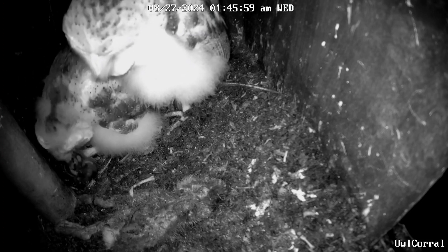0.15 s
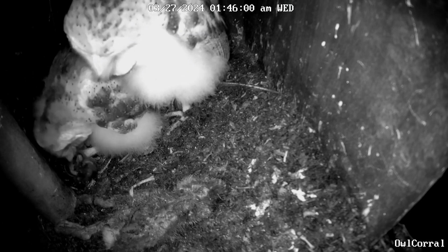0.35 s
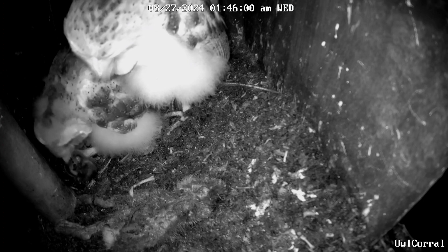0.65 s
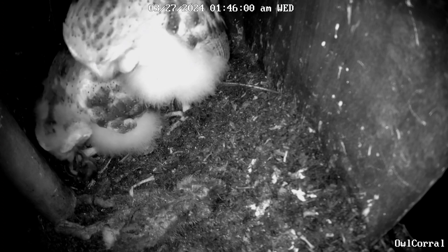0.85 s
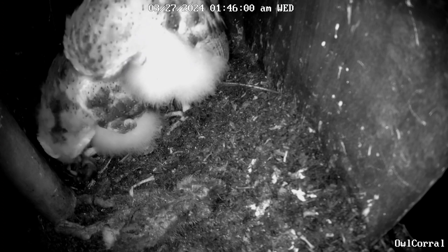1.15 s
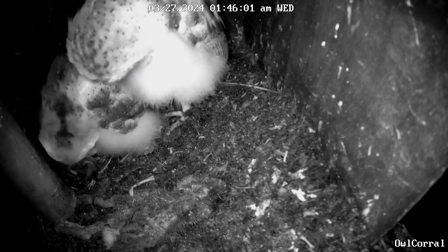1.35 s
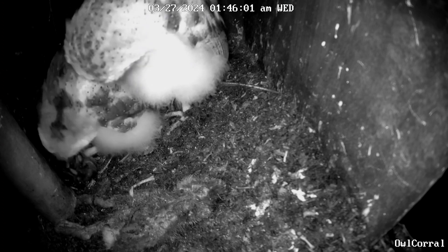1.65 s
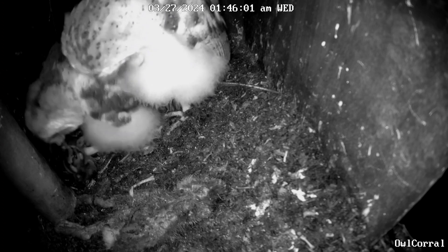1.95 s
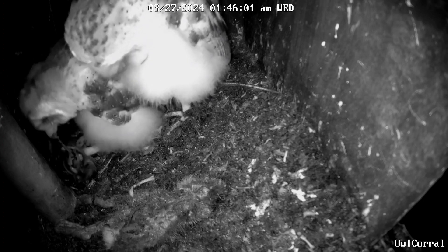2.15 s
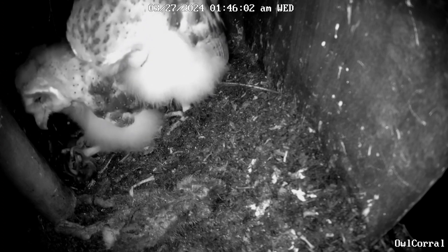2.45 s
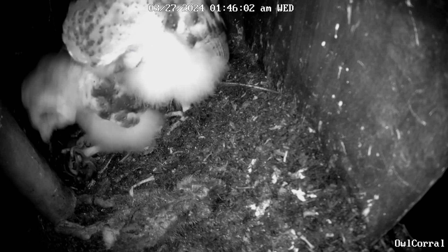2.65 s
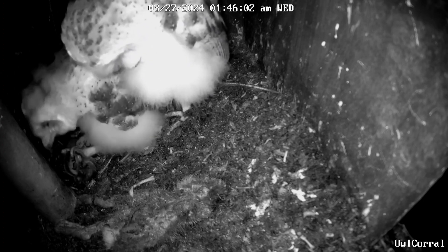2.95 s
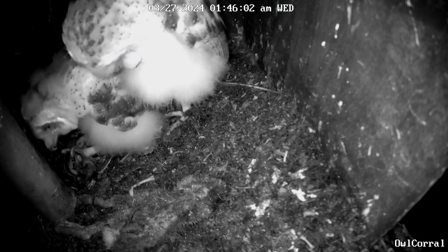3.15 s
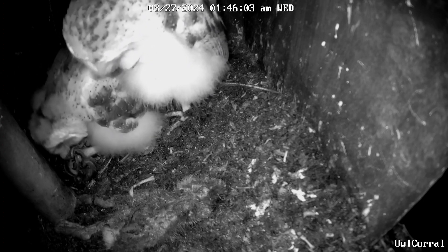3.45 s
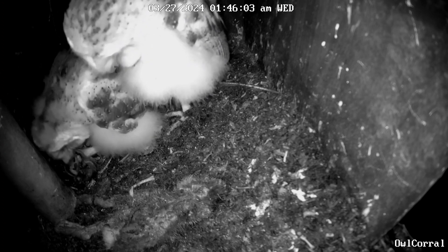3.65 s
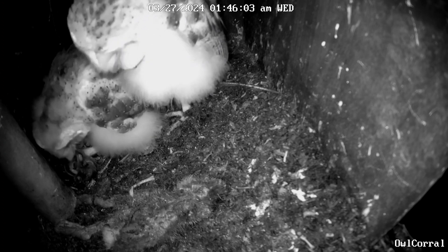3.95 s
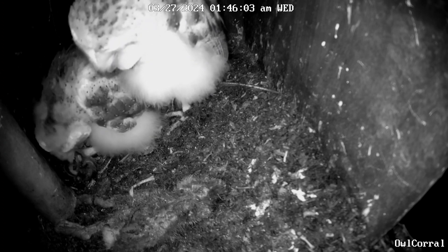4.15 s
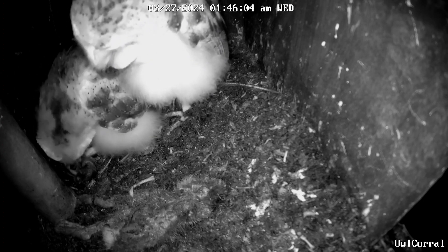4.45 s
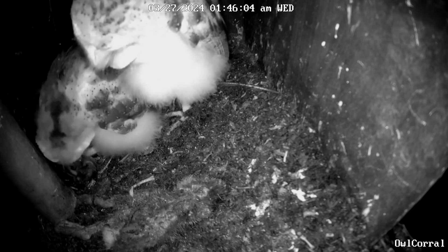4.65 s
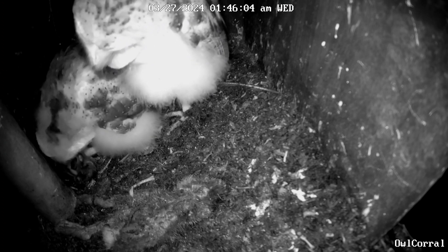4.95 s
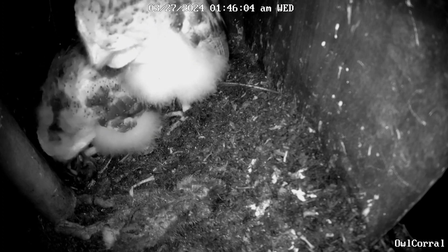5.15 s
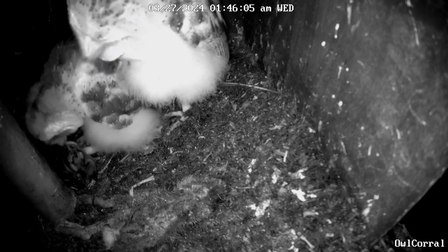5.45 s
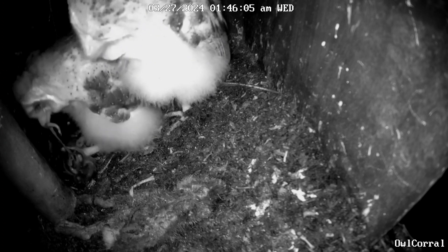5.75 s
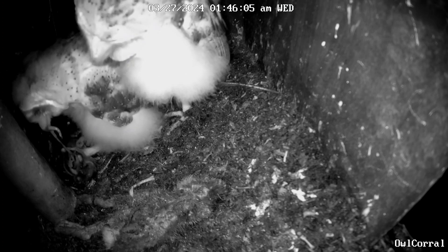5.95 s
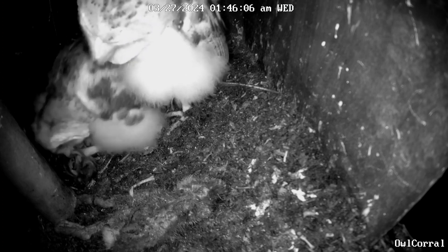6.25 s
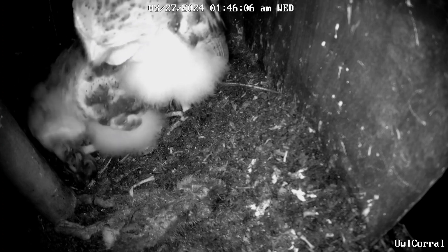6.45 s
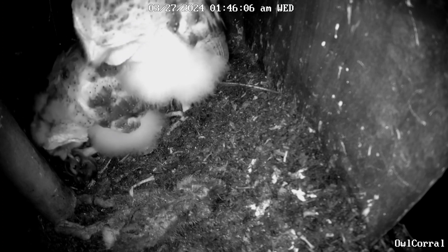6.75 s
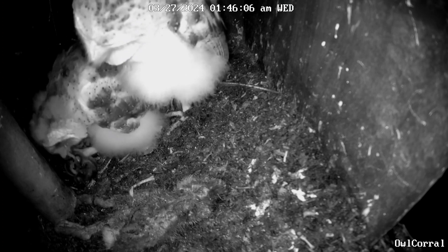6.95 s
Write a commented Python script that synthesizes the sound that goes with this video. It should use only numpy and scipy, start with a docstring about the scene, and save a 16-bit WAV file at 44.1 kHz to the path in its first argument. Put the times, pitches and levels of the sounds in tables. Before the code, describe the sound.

A young owl begs with three harsh, swelling hisses over faint trilling chitters inside a wooden nest box, ending with low thumps on the boards.

```python
"""Owlets in a wooden nest box at night, heard through a camera's small mono microphone.
A low hum, rumble and even ticking (shaped noise) run throughout, with chitter trills of tiny gliding pips.
Dull scuffs of noise come at 1.1, 3.0, 4.8 and 6.6 s, and one faint low peep, a gliding sine, at 2 s.
From 2.3, 3.9 and 6.1 s an owlet begs with a harsh swelling hiss: noise through throat and beak resonances.
Just before the third hiss, and more after it, an owl bumps the boards, whose decaying modes boom."""
import sys
import numpy as np
from scipy import signal
from scipy.fft import rfft, irfft
from scipy.io import wavfile

SR = 44100
rng = np.random.default_rng(int(sys.argv[2]) if len(sys.argv) > 2 else 0)


def file_out(sig):
    """Save sig as 16-bit WAV at sys.argv[1]."""
    # one column per channel
    cols = np.atleast_2d(sig).T
    # limit, then scale
    lim = np.clip(cols, -1, 1)
    pcm = np.round(lim * 32767).astype(np.int16)
    wavfile.write(sys.argv[1], SR, pcm)


N = 312669
TIME = np.arange(N) / SR  # s
FREQ = np.arange(N // 2 + 1) * SR / N  # Hz


def undb(db):
    """Decibels to gain."""
    return 10 ** (np.asarray(db) / 20)


def add(track, start_s, sound):
    """Mix a sound into the track; one due before the track begins starts with it."""
    i = max(int(start_s * SR), 0)
    track[i:i + len(sound)] += sound[:max(N - i, 0)]


def colour(x, gain):
    """Filter by a gain per frequency; the result has rms 1."""
    y = irfft(rfft(x) * gain, N)
    return y / y.std()


def noise(gain):
    """Coloured noise of rms 1."""
    return colour(rng.standard_normal(N), gain)


def wander(rate_hz):
    """Smooth random motion of spread 1, mostly slower than the given rate."""
    return noise(1 / (1 + (FREQ / rate_hz) ** 4))


def resonances(modes):
    """Gain of steep-sided resonances (centre_hz, nominal width_hz, level_db), summed in power."""
    power = 0
    for centre_hz, width_hz, level_db in modes:
        offset = (FREQ - centre_hz) / (0.68 * width_hz)
        power = power + undb(2 * level_db) / (1 + offset ** 2) ** 2
    return np.sqrt(power)


def contour(points):
    """Gain of a spectrum drawn through points (freq_hz, level_db) on a log frequency axis."""
    hz, db = np.transpose(points)
    return undb(np.interp(np.log(FREQ + 1), np.log(hz), db))


def note(length_s, from_hz, to_hz):
    """A short gliding sine that swells and fades."""
    u = np.linspace(0, 1, int(length_s * SR))
    phase = 2 * np.pi * np.cumsum(from_hz + (to_hz - from_hz) * u) / SR
    return np.sin(np.pi * u) ** 2 * np.sin(phase)


def squeaks(table, rough_db, rough_hz):
    """Single gliding notes, made hoarse by a fast random flutter of level."""
    out = np.zeros(N)
    for start_s, length_s, from_hz, to_hz, peak_db in table:
        add(out, start_s, undb(peak_db) * note(length_s, from_hz, to_hz))
    return out * undb(rough_db * wander(rough_hz))


# spectrum of night rumble and microphone hiss, relative:
# freq_hz [Hz], level_db [dB per Hz]
NIGHT_SPECTRUM = [(20, -0.5), (45, -7), (120, -5), (150, -18.5), (230, -26), (400, -29), (700, -31.5),
                  (1100, -30.5), (1800, -34.5), (3200, -35.5), (4500, -39), (8000, -41.5)]


def night(level_db=-63):
    """Noise of rumble and microphone hiss, whose level wavers slowly."""
    return noise(contour(NIGHT_SPECTRUM) * (FREQ > 12)) * undb(level_db + 0.5 * wander(3))


def hum(centre_hz=121.8, width_hz=12, level_db=-65):
    """A narrow band of noise, heard as a wavering low hum."""
    return undb(level_db) * noise(resonances([(centre_hz, width_hz, 0)]))


def ticking(first_s=0.258, every_s=2 / 15, length_s=0.01, level_db=-71):
    """The camera's faint ticks: puffs of high noise, evenly spaced in a pattern that restarts every second."""
    times = (first_s + np.arange(0, 1, every_s)) % 1
    ticks = sum(np.exp(-(2 * (TIME % 1 - s) / length_s) ** 2) for s in times)
    return undb(level_db) * ticks * noise(resonances([(6150, 2600, 0)]))


# feet shuffling in the litter:
# middle_s [s], length_s [s], centre_hz [Hz], level_db [dB]
SCUFFS = [(1.107, 0.0094, 710, -71), (3.026, 0.025, 307, -61.5), (4.789, 0.018, 820, -64),
          (6.582, 0.01, 400, -55)]


def shuffles():
    """Brief dull scuffs in the litter, each a puff of band noise."""
    out = np.zeros(N)
    for middle_s, length_s, centre_hz, level_db in SCUFFS:
        puff = np.exp(-(2 * (TIME - middle_s) / length_s) ** 2)
        out += undb(level_db) * puff * noise(resonances([(centre_hz, 0.45 * centre_hz, 0)]))
    return out


# feet and body against the boards:
# start_s [s], push_db [dB], contact_s [s]
BOARD_BUMPS = [(5.913, -45, 0.0042), (5.922, -36, 0.0078), (6.554, -42, 0.004), (6.627, -28, 0.0031),
               (6.648, -43.5, 0.0034), (6.82, -46, 0.004), (6.882, -34, 0.003), (6.903, -29, 0.003),
               (6.917, -18.5, 0.011)]
# ringing modes of the box:
# mode_hz [Hz], t60_s [s], level_db [dB, relative]
BOARD_MODES = [(76.7, 0.15, 2), (98, 0.29, -4.5), (131.4, 0.25, 5), (170, 0.29, -22), (218, 0.25, -8.5),
               (266, 0.083, -15), (295, 0.11, -13.5), (390, 0.12, -16.5), (466, 0.076, -13.5)]


def bumps():
    """Soft pushes ring the boards; a longer contact gives a duller boom."""
    pushes, t = np.zeros(N), TIME[:SR // 2]
    for start_s, push_db, contact_s in BOARD_BUMPS:
        push = np.hanning(int(contact_s * SR))
        add(pushes, start_s, undb(push_db) * push / push.sum())
    ring = np.zeros(len(t))
    for mode_hz, t60_s, level_db in BOARD_MODES:
        ring += undb(level_db - 60 * t / t60_s) * np.sin(2 * np.pi * mode_hz * t)
    boom = signal.fftconvolve(pushes, ring)[:N]
    # slow pressure leaks out through the entrance hole
    leak = signal.butter(6, 68, "high", fs=SR, output="sos")
    return signal.sosfilt(leak, boom)


PIPS_PER_S = 55  # pace of all trilling


def throb(depth_db):
    """Gain that pulses at the slightly uneven pace of a trill."""
    phase = 2 * np.pi * np.cumsum(PIPS_PER_S * (1 + 0.025 * wander(6))) / SR
    return undb(depth_db * np.sin(phase))


def twitter(centre_hz=2500, width_hz=340, level_db=-79, swell_db=4):
    """The faintest trilling: pulsing band noise that goes on throughout, swelling and sinking."""
    band = noise(resonances([(centre_hz, width_hz, 0)]))
    return band * throb(depth_db=2.5) * undb(level_db + swell_db * wander(4))


UNDER_FOLLOWS = 0.41  # the low tone fades this many dB per dB of the pip


def trill(crest_s, pitch_hz, level_db, under_db, under_share=0.42):
    """Pips (middle_s, pitch_hz, level_db, under_hz, under_db) that climb, swell slowly and fade faster."""
    k = np.arange(-7, 4)  # pips counted from the loudest
    drop = np.where(k < 0, 1.7, 4.2) * abs(k) ** 1.4  # dB below the loudest
    pitch = pitch_hz * (1 + 0.014 * k)
    return zip(crest_s + k / PIPS_PER_S, pitch, level_db - drop,
               under_share * pitch, under_db - UNDER_FOLLOWS * drop)


def chip(first_s, pitch_hz, level_db, under_db, under_share=0.483):
    """Three pips, listed as for a trill, that start at full strength, climb and die fast."""
    k = np.arange(3)
    drop = 2.4 * k ** 2  # dB below the first
    pitch = pitch_hz * (1 + 0.0091 * k)
    return zip(first_s + k / PIPS_PER_S, pitch, level_db - drop,
               under_share * pitch, under_db - UNDER_FOLLOWS * drop)


# echoes of a pip off the box walls:
# delay_s [s], level_db [dB re direct sound]
WALL_ECHOES = [(.0034, -18.5), (.0066, -11.5), (0.0124, -12.5), (0.017, -11)]


def box_response(ring_db=-13, ring_t60_s=0.12):
    """Impulse response of the box: direct sound, wall echoes and a decaying noise tail."""
    t = TIME[:SR // 8]
    box = rng.standard_normal(len(t)) * undb(-60 * t / ring_t60_s)
    box *= undb(ring_db) / np.linalg.norm(box)
    box[0] = 1
    for delay_s, level_db in WALL_ECHOES:
        box[int(delay_s * SR)] += undb(level_db)
    return box


# swelling trills of the chicks, describing the loudest pip:
# crest_s [s], pitch_hz [Hz], level_db [dB before trim], under_db [dB of its low tone before trim]
CHICK_TRILLS = [(0.02, 2640, -62, -76), (0.103, 2570, -59.5, -76), (0.362, 2560, -56.5, -77),
                (0.6, 3010, -66, -74), (0.826, 2445, -42.5, -65), (0.902, 2490, -51, -66.5),
                (1.619, 2430, -52, -77), (1.649, 3100, -59.5, -79), (2.105, 2520, -65, -79),
                (2.25, 3050, -64, -69), (2.302, 2384, -46.5, -65), (2.846, 2476, -42.5, -54.5),
                (3.151, 3140, -58.5, -77), (3.203, 2410, -50.5, -70), (3.599, 2416, -42, -65.5),
                (3.657, 2570, -61, -68), (4.31, 2610, -41, -56), (4.361, 3000, -54, -69),
                (4.487, 2610, -51.5, -74), (4.576, 3050, -57.5, -80), (4.885, 2434, -44.5, -62),
                (5.196, 2424, -45, -74), (5.578, 2405, -46, -60), (6.031, 2355, -60.5, -66.5),
                (6.108, 2360, -47, -65), (6.766, 2426, -39, -58), (6.85, 2433, -39.5, -52.5)]
# short chips, following most trills by about 0.12 s and describing the first pip:
# first_s [s], pitch_hz [Hz], level_db [dB before trim], under_db [dB of its low tone before trim]
CHICK_CHIPS = [(0.165, 2710, -55.5, -79), (0.477, 2620, -57.5, -72), (0.963, 2470, -40, -64),
               (1.726, 2520, -44.5, -65), (1.782, 3280, -51, -76), (2.974, 2690, -56.5, -66),
               (3.284, 3280, -57, -77), (3.326, 2460, -46, -64), (3.717, 2480, -36, -53.5),
               (3.783, 2660, -47.5, -66), (4.606, 2770, -57, -71), (4.71, 3240, -59.5, -76),
               (5.023, 2530, -40, -63), (5.302, 2460, -41, -65), (5.69, 2444, -43, -49.5),
               (5.74, 2770, -61, -74), (6.963, 2524, -37.5, -48.5)]


def chitter(pip_s=0.009, glide=0.048, pip_trim_db=0.5, under_trim_db=-2, scatter_db=0.88, hoarse_db=1.5):
    """Tiny rising pips, each over a weak tone at under half its pitch, bounce around the box."""
    out = np.zeros(N)
    calls = [trill(*row) for row in CHICK_TRILLS] + [chip(*row) for row in CHICK_CHIPS]
    for pips in calls:
        for middle_s, pitch_hz, level_db, under_hz, under_db in pips:
            late, sharp, loud = rng.standard_normal(3)  # no two pips are quite alike
            # sweep upward through the pitch, by a share of it to either side
            sweep = (1 + 0.0092 * sharp) * np.array([1 - glide, 1 + glide])
            pip = undb(level_db + pip_trim_db) * note(pip_s, *pitch_hz * sweep)
            under = undb(under_db + under_trim_db) * note(pip_s, *under_hz * sweep)
            add(out, middle_s + 0.00027 * late - pip_s / 2, undb(scatter_db * loud) * (pip + under))
    hoarse = out * undb(hoarse_db * wander(350))
    return signal.fftconvolve(hoarse, box_response())[:N]


# one faint low peep:
# start_s [s], length_s [s], from_hz [Hz], to_hz [Hz], peak_db [dB before roughness]
LOW_PEEP = (1.965, 0.09, 545, 475, -69)


def peep():
    """A single low note that slides down, slightly rough."""
    return squeaks([LOW_PEEP], rough_db=2.5, rough_hz=150)


def gate(on_s, off_s):
    """Air flow in dB: a quick attack up to on_s, a hold, a release from off_s."""
    attack = 2399 * np.maximum(on_s - TIME, 0)  # dB per s
    release = 999 * np.maximum(TIME - off_s, 0)
    return -np.minimum(attack + release, 120)


def effort(start_s, widest_s, shut_s, crest_db, throat_db, lead_s):
    """Gains of rasp, throat and rush: accented start, swell to the widest gape, quick close, leak of air."""
    voiced_s = start_s + 0.035  # throat and rasp build up after the air has started
    voice = gate(start_s, shut_s) - 650 * np.maximum(voiced_s - TIME, 0)
    # the rasp climbs to its crest, then sags ever faster until the beak shuts
    climb = np.interp(TIME, [voiced_s, widest_s], [-12.5, 0])
    sag = 16 * np.interp(TIME, [widest_s, shut_s], [0, 1]) ** 3
    accent = np.exp(-((TIME - voiced_s) / 0.036) ** 2)  # early stress on throat and rush
    push = np.exp(-((TIME - widest_s) / 0.052) ** 2) - 1
    # a thin stream of air before the hiss and for a moment after it
    leak = undb(-57 + gate(start_s - lead_s, shut_s + 0.064))
    rasp = undb(crest_db + climb - sag + voice)
    throat = undb(throat_db + 6 * accent + 2.5 * push + voice)
    # the low rush of air outlasts the rasp
    rush = undb(-37 + 3 * accent + 3 * push + gate(start_s, shut_s + 0.0046))
    return rasp + leak, throat + leak, rush + undb(-2.5) * leak


# resonances of the open beak and the box around it:
# centre_hz [Hz], width_hz [Hz, nominal], level_db [dB, relative]
BEAK_MODES = [(2591, 38, -4), (2865, 91, -2.5), (3044, 62, -4.5), (3175, 74, 1.5), (3350, 87, 0.5),
              (3478, 190, -1), (3760, 85, -2), (3890, 80, -5.5), (4120, 70, -9.5), (4270, 59, -3),
              (4535, 82, -0.5), (4622, 64, -0.5), (4860, 46, -8.5), (4960, 60, -11), (5090, 88, -8.5),
              (5225, 70, -4.5), (5450, 140, -8), (5740, 300, -17), (6230, 110, -10.5), (6637, 180, -9),
              (7320, 300, -19), (7650, 520, -18.5)]
# fixed resonances of the throat:
# centre_hz [Hz], width_hz [Hz, nominal], level_db [dB, relative]
THROAT_MODES = [(1990, 66, -22), (2393, 39, 4), (2410, 60, -9.5)]
# spectrum of the low rush of air, relative:
# freq_hz [Hz], level_db [dB per Hz]
RUSH_SPECTRUM = [(35, -36.5), (60, -11.5), (118, 1), (203, -9.5), (295, 3), (371, -7), (487, 0), (587, -5),
                 (659, -18.5), (817, -26), (890, -11), (1010, -4), (1190, -4.5), (1450, -12), (1850, -13.5),
                 (2400, -38.5), (4070, -120)]


def hiss(start_s, widest_s, shut_s, crest_db, throat_db, throat_hz, treble_db, lead_s):
    """Air tears through the throat in uneven spurts; the rasp brightens as the beak opens."""
    rasp, throat, rush = effort(start_s, widest_s, shut_s, crest_db, throat_db, lead_s)
    air = rng.standard_normal(N) * undb(2 * wander(220))
    beak = resonances(BEAK_MODES)
    # the band that a wide gape lifts
    upper = np.interp(FREQ, [3900, 4460, 6450, 7100], [0.19, 1, 1.0, 0.24])
    gape = np.exp(-((TIME - widest_s) / 0.16) ** 2)
    narrow = colour(air, beak * undb(upper * (treble_db - 3) + 1.0 * (FREQ < 2750)))
    wide = colour(air, beak * undb(upper * (treble_db + 3)))
    dull = colour(air, beak * undb(-16 * upper))
    # the treble comes in last, over the first 0.08 s of each hiss
    treble_in = np.interp(TIME, [start_s, start_s + 0.08], [0, 1])
    bright = gape * wide + (1 - gape) * narrow
    mouth = rasp * (treble_in * bright + (1 - treble_in) * dull)
    ring = colour(air, resonances(THROAT_MODES + [(throat_hz, 170, 1.5)]))
    low_air = colour(air, contour(RUSH_SPECTRUM))
    return mouth + throat * ring + undb(-2.27) * rush * low_air


# the voice slides down as the beak shuts:
# lead_s [s before shutting], length_s [s], from_hz [Hz], to_hz [Hz], peak_db [dB before roughness]
VOICE_SLIDE = (0.01, 0.04, 2399.5, 1950, -31.5)
# the gulp that goes with it:
# lead_s [s before shutting], length_s [s], from_hz [Hz], to_hz [Hz], peak_db [dB before each hiss's gulp_db]
GULP_NOTES = [(.012, .03, 450, 190, -30), (0.0008, 0.024, 1270, 1160, -33)]


def closing(shut_s, gulp_db):
    """Notes of the shutting beak: the voice slides down, with a lower gulp."""
    notes = [(VOICE_SLIDE, 0)] + [(row, gulp_db) for row in GULP_NOTES]
    return [(shut_s - lead_s, length_s, from_hz, to_hz, peak_db + extra_db)
            for (lead_s, length_s, from_hz, to_hz, peak_db), extra_db in notes]


# begging hisses:
# start_s [s, air at full flow], widest_s [s, widest gape], shut_s [s, beak shuts],
# crest_db [dB, rasp at its crest], throat_db [dB before accent], throat_hz [Hz],
# treble_db [dB, tilt of the upper band before gape], lead_s [s, faint air beforehand], gulp_db [dB, gulp trim]
BEGGING_HISSES = [(2.324, 2.635, 2.7324, -18, -29.5, 2240, -0.5, 0.042, -6.5),
                  (3.871, 4.168, 4.268, -19.5, -29, 2134, -1, 0.0018, -2.5),
                  (6.114, 6.42, 6.522, -14.5, -30, 2137, 1, 0.0055, -24)]


def begging():
    """Each hiss of torn air ends in the hoarse slide and gulp of the shutting beak."""
    hisses = sum(hiss(*row[:-1]) for row in BEGGING_HISSES)
    endings = [n for row in BEGGING_HISSES for n in closing(row[2], row[-1])]
    return hisses + squeaks(endings, rough_db=4, rough_hz=450)


def scene():
    """Everything reaches one microphone, copied to both channels."""
    background = night() + hum() + ticking()
    movement = shuffles() + bumps()
    voices = twitter() + chitter() + peep() + begging()
    return np.tile(background + movement + voices, (2, 1))


def record(dry):
    """The camera's narrow band: a steep low-pass ends the treble at 8050 Hz."""
    return signal.sosfilt(signal.ellip(12, 0.2, 80, 8050, fs=SR, output="sos"), dry)


dry = scene()
out = record(dry)
file_out(out)
```